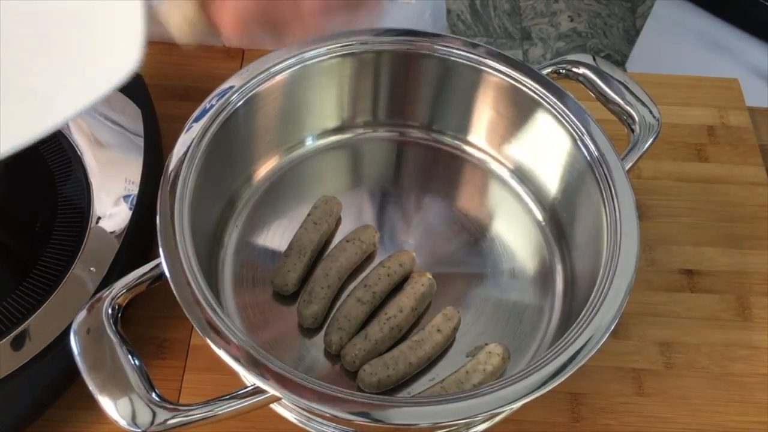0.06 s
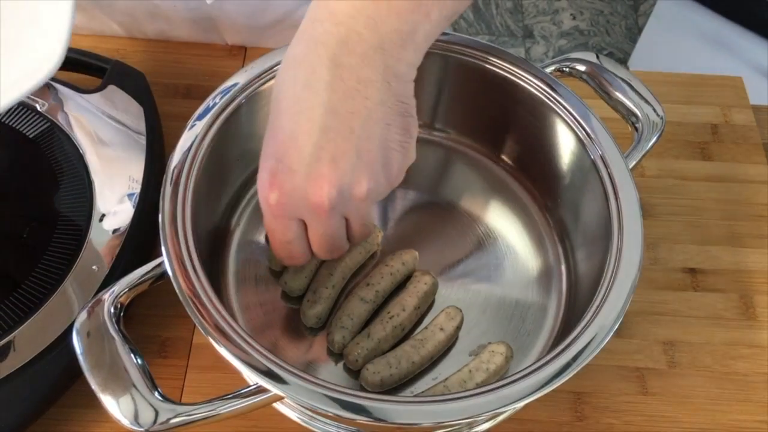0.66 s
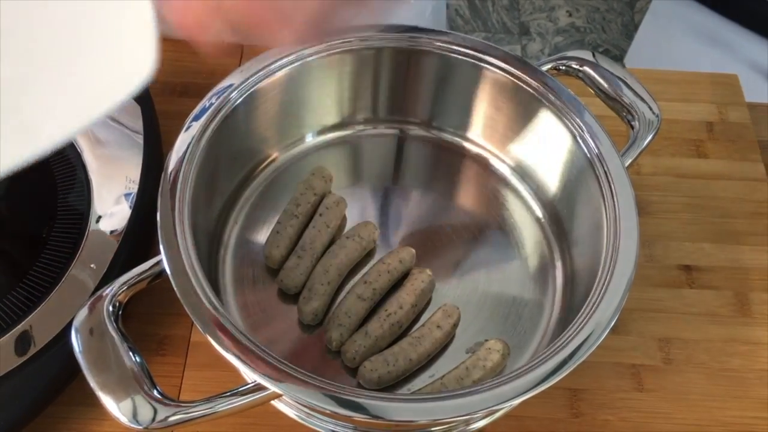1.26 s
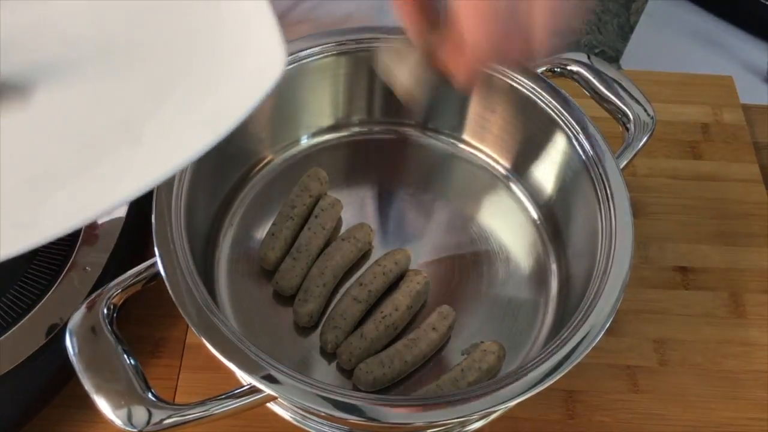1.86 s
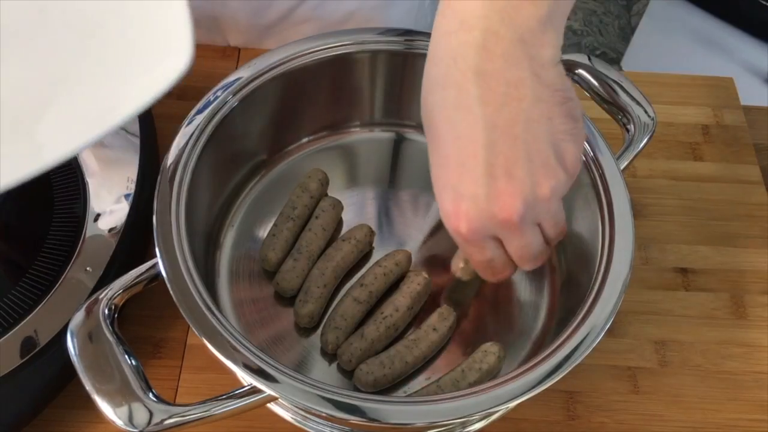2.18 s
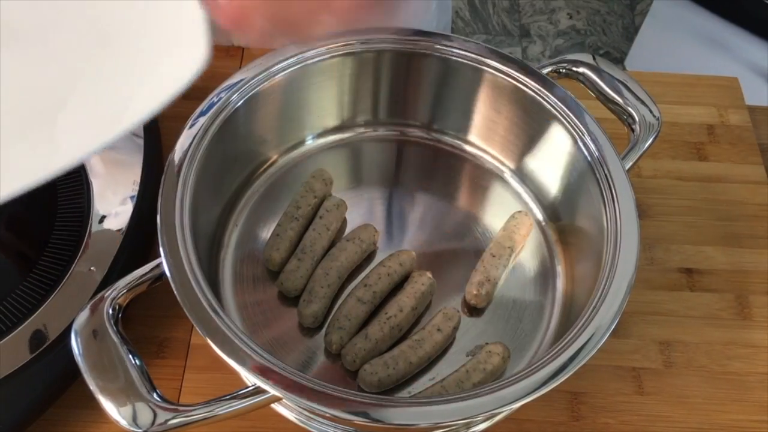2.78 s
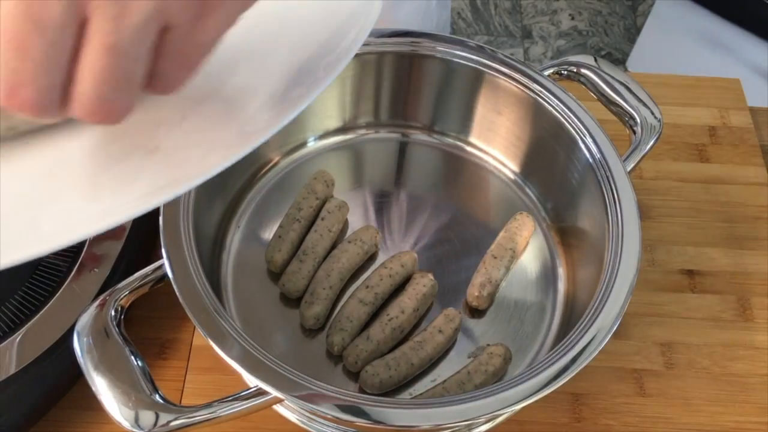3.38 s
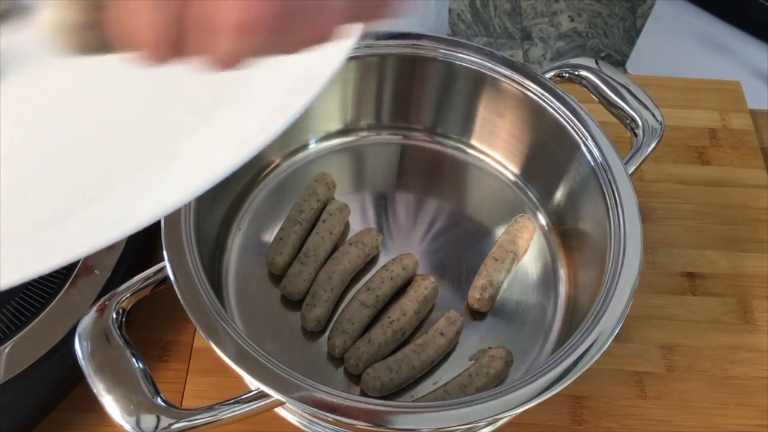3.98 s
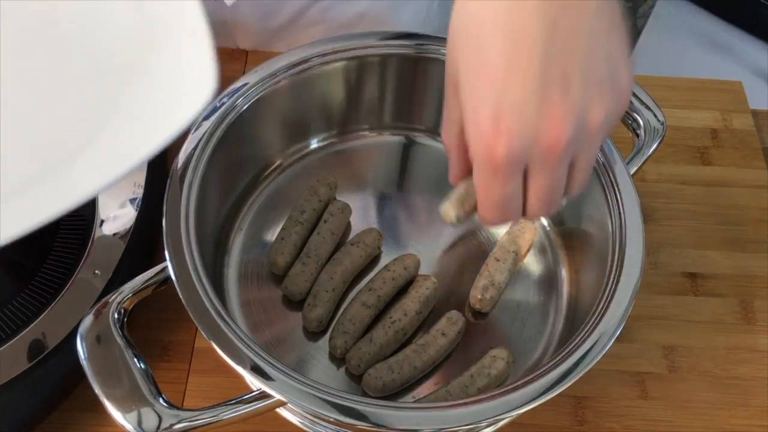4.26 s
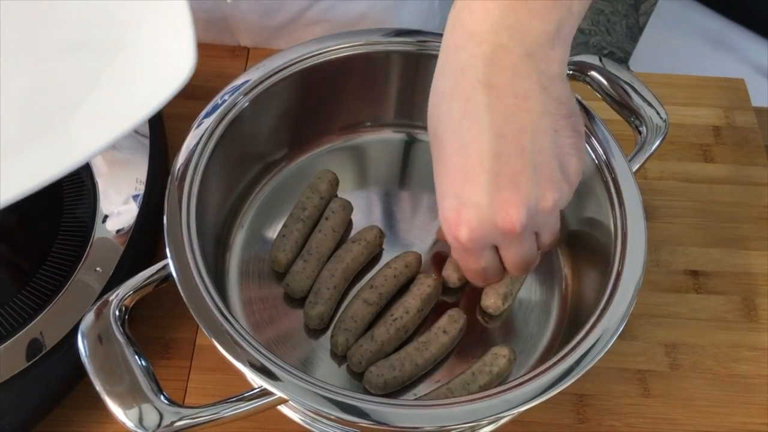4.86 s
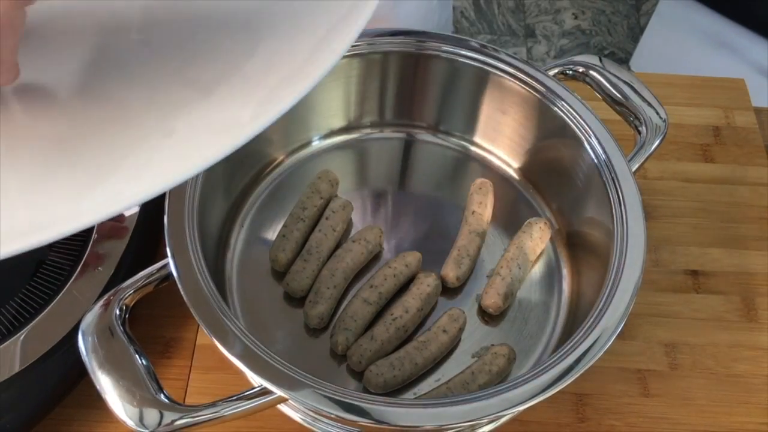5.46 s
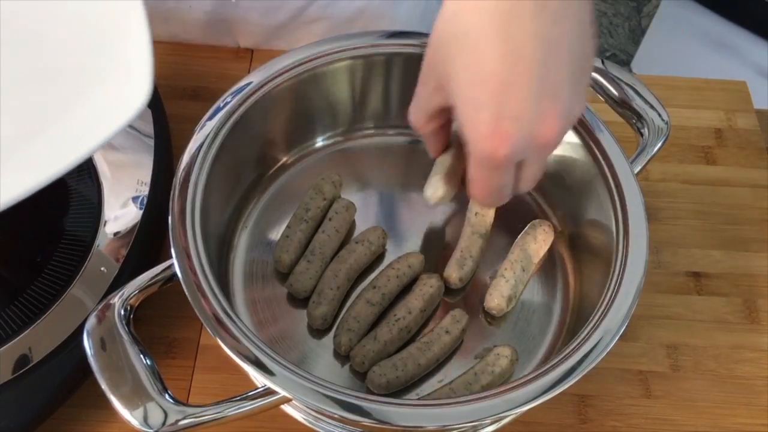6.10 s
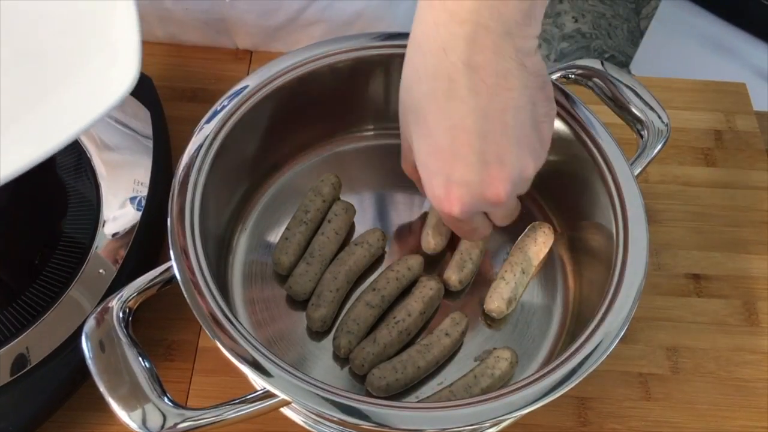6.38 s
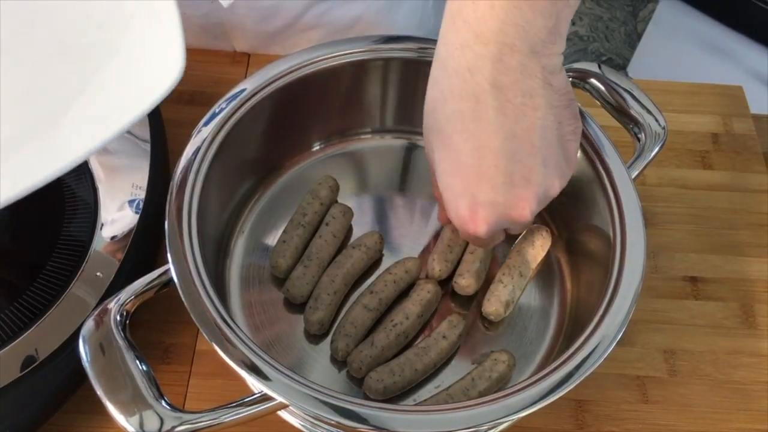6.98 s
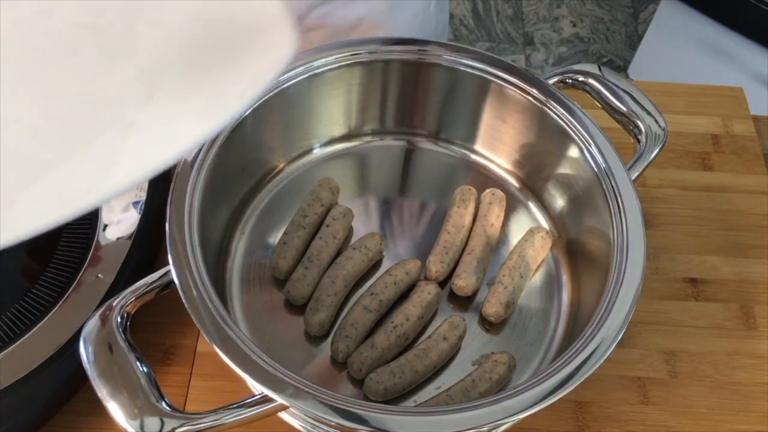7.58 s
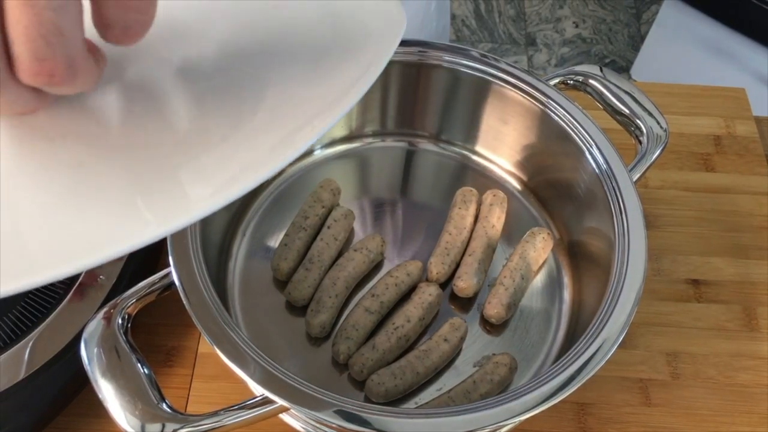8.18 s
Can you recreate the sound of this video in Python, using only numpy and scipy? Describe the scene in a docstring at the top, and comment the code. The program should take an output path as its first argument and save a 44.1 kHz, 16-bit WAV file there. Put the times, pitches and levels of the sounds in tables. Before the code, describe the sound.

Hard sausages are laid one at a time in a dry steel pot. Each lands with a sharp tap or a quick little clatter that makes the metal ring briefly, sometimes with a tiny squeak or a low thump of the pot. Soft knocks on a china plate fall between the four landings and after the last. The sounds are close, with a light kitchen echo over a faint rumble, hum and hiss.

```python
"""In a small kitchen, hard, cold sausages are taken from a plate and laid one by one in a dry steel pot.
Each lands in a quick clatter of touches that sets the pot ringing; some skid with a tiny squeak,
and now and then the pot thumps on its board. Between landings the plate is knocked softly.
Landings and knocks echo off the walls, over a low rumble, a hum and a faint hiss."""
import sys
import numpy as np
from scipy import signal
from scipy.fft import rfft, irfft
from scipy.io import wavfile
from scipy.ndimage import uniform_filter1d

SR = 44100
rng = np.random.default_rng(int(sys.argv[2]) if len(sys.argv) > 2 else 0)


def wav_record(signal):
    """Record a signal, one row per channel, as 16-bit PCM in the file named by sys.argv[1]."""
    frames = np.transpose(np.atleast_2d(signal))
    bounded = np.clip(frames, -1, 1)
    # unit amplitude maps onto the largest positive 16-bit level
    quanta = np.round(bounded * 32767).astype(np.int16)
    wavfile.write(sys.argv[1], SR, quanta)


N = 363384
TIME = np.arange(N) / SR
MIC_TOP_HZ, FINAL_TOP_HZ = 9900, 15800


def undb(db):
    """Turn decibels into a factor to multiply by."""
    return 10 ** (np.asarray(db) / 20)

def unit_rms(x):
    """Scale to an average power of 1."""
    return x / np.sqrt(np.mean(x ** 2))

def unit_energy(x):
    """Scale to a total energy of 1."""
    return x / np.sqrt(np.sum(x ** 2))

def fade(t60, size):
    """A smooth decay that loses 60 dB in t60 seconds, the fade time."""
    return np.exp(-np.log(1000) * TIME[:size] / t60)

def add(out, start_s, x):
    """Mix x into out from start_s on."""
    i = int(start_s * SR)
    out[i:i + len(x)] += x[:N - i]

def noise(colour):
    """Noise shaped by (frequency [Hz], level [dB]) points."""
    hz, db = np.transpose(colour)
    f = np.fft.rfftfreq(N, 1 / SR) + 1
    gain = undb(np.interp(np.log(f), np.log(hz), db))
    return unit_rms(irfft(rfft(rng.standard_normal(N)) * gain, N))

def wander(rate_hz):
    """A slow random drift, about 1 in size."""
    k = int(SR / rate_hz)
    steps = np.repeat(rng.standard_normal(N // k + 1), k)
    return unit_rms(uniform_filter1d(uniform_filter1d(steps, k), k)[:N])

def ring(tones):
    """Fading tones from (pitch [Hz], level [dB], fade time [s]) rows."""
    return sum(undb(db) * fade(t60, SR) * np.sin(2 * np.pi * hz * TIME[:SR]) for hz, db, t60 in tones)

def hump(hz, width_hz, order=2):
    """A resonance: a hill of power around one pitch, steeper at a higher order."""
    f = np.fft.rfftfreq(1024, 1 / SR) + 1
    power = 1 / (1 + ((f ** 2 - hz ** 2) / (f * width_hz)) ** 2) ** order
    return power / power.mean()

def click(power):
    """The sharpest click that has this power at each frequency."""
    cepstrum = irfft(np.log(power + 1e-18) / 2)
    half = len(cepstrum) // 2
    cepstrum[1:half] *= 2
    cepstrum[half + 1:] = 0
    return irfft(np.exp(rfft(cepstrum)))

def shimmer(x, db, t60, size=8192):
    """Follow x with a dense, short ringing, different every time."""
    tail = unit_energy(rng.standard_normal(size) * fade(t60, size))
    return signal.fftconvolve(x, signal.unit_impulse(size) + undb(db) * tail)

# the colour of the room's rumble: (frequency [Hz], relative level [dB])
RUMBLE_COLOUR = [(12, -28), (20, 1), (43, -1.5), (97, -5), (165, -9.5), (259, -11.5), (355, -17),
                 (501, -17), (542, -16.5), (587, -15.5), (1370, -20), (1730, -22), (3440, -24.5),
                 (9390, -29.5), (11000, -49), (14300, -70), (22000, -120)]
def rumble_and_hum():
    """The room rumbles softly under a low, wavering hum."""
    rumble = noise(RUMBLE_COLOUR) * undb(-57.69 + wander(7.4))
    hum_hz = 95 + 3 * wander(23)
    hum = np.sin(2 * np.pi * np.cumsum(hum_hz) / SR) * undb(-67 + 1.5 * wander(4))
    return rumble + hum

# the colour of the hiss: (frequency [Hz], relative level [dB])
HISS_COLOUR = [(300, -6), (650, -2.5), (1100, -10), (2200, -4), (2700, -1), (3600, 2.5), (4300, -0.5),
               (6500, -5), (9300, -4), (10500, -4)]
# how loud the hiss is: (time [s], level [dB])
HISS_SWELL = [(0, -71), (1.15, -64), (2.2, -64), (3, -59.5), (3.6, -63.5), (4.9, -60), (5.3, -57),
              (6.1, -54.5), (7.6, -55), (8.24, -60.5)]
def hiss():
    """A faint hiss slowly swells and sinks."""
    swell_db = np.interp(TIME, *np.transpose(HISS_SWELL))
    return noise(HISS_COLOUR) * undb(swell_db + 0.54 * wander(12))

def through_steel(x, lag_s=0.001492, at_hz=1000):
    """High notes travel faster in sheet steel, so a click arrives as a brief falling chirp."""
    f = np.fft.rfftfreq(len(x), 1 / SR)
    late_cycles = lag_s * (2 * np.sqrt(at_hz * f) - f * np.sqrt(at_hz / MIC_TOP_HZ))
    return irfft(rfft(x) * np.exp(-2j * np.pi * late_cycles))

def touch(db, clack_hz, thud_db, snap_db, tick_db, base_hz, weight_db):
    """One touch shakes the pot's base (thud), its wall (clack) and the hard skin (snap, tick)."""
    thud = hump(base_hz, 440) + 0.4049 * hump(652.24, 160) + undb(weight_db) ** 2 * hump(424, 370)
    clack = (0.52 * hump(clack_hz, 780) + 0.095 * hump(2044, 690)
             + 0.16 * hump(2520, 800) + 0.11 * hump(3790, 1000))
    snap = hump(4926.9, 650) + 1.13 * hump(5900, 2360)
    tick = hump(8069.6, 1700) + 0.4 * hump(9650, 1500)
    body = click(clack + 0.32 * undb(thud_db) ** 2 * thud)
    body = shimmer(through_steel(body), db=-3, t60=0.038)
    # the rough skin meets the steel at many points, which smears the high notes
    skin = click(0.5 * undb(snap_db) ** 2 * snap + 0.47 * undb(tick_db) ** 2 * tick)
    skin = shimmer(through_steel(skin), db=0.1, t60=0.034)
    return undb(db + 16.5) * (body + undb(-1) * skin)

def chatter(lead_s, settle_s, chatter_db, gap_s=0.003, build_db_per_s=595, settle_db_per_s=401):
    """A sausage lands bit by bit, touching before and after the main blow: (delay [s], level [dB])."""
    touches = [(0, 0)]
    for side, length_s, db_per_s in ((-1, lead_s, build_db_per_s), (0.98, settle_s, settle_db_per_s)):
        count = round(length_s / gap_s)
        for k in range(count):
            jitter, scatter_db = rng.standard_normal(2)
            away_s = length_s * (k + 1) / count + 0.18 * gap_s * jitter
            touches.append((side * away_s, chatter_db - db_per_s * k * gap_s + scatter_db))
    return touches

# a sausage taps the steel; thud, snap, tick and chatter are relative to the tap's level:
# (time [s], level [dB], clack pitch [Hz], thud [dB], snap [dB], tick [dB],
#  lead-in [s], settling [s], chatter [dB])
SAUSAGE_TAPS = [(0.5713, -16, 3080, -11, -8, -16.5, 0.0085, 0.0091, 0.5),
                (0.6288, -15.5, 3200, -6, -13, -21, 0.00022, 0.00077, 0),
                (2.5106, -14.5, 3050, -12.5, -9.5, -12, 0.0019, 0.0074, -8),
                (4.6291, -24.5, 3291, 1.5, -6.5, -1.5, 0, 0.017, -18),
                (4.665, -38.5, 2870, -8, -7, -8, 0.0024, 0.0031, 0),
                (4.696, -33.5, 3300, -20, -12, -14, 0.013, 0.0049, -9),
                (4.8263, -26, 3050, -1.5, -12.5, -5.5, 0.0012, .009, -4.5),
                (4.9325, -34, 3145, -15, -9, -9, 0, 0, 0),
                (4.9636, -46.5, 3200, -22, -5.5, -3.5, 0.0026, 0.0045, 0),
                (6.5001, -25, 3055, -0.5, -8, -9, 0.002, 0.017, -3.5),
                (6.5353, -17, 3257, -6, -12.5, -15, 0.014, .008, -4.5),
                (6.5534, -12.5, 3190, -11.5, -18, -15, .0044, 0.0042, -1),
                (6.7836, -18.5, 2940, -16, -5.5, -13, 0, 0.0046, -2.5),
                (6.9352, -22, 3280, -10.5, -6.5, -12.5, 0.0077, 0, -1.5),
                (7.2263, -12, 2660, -2.5, -10, -15.5, 0.008, 0, -13.5)]
def taps(start, end, base_hz, weight_db, spread_octaves=0.14):
    """The taps from start to end: each a quick run of touches at slightly different pitches."""
    out = np.zeros(N)
    for s, db, hz, thud_db, snap_db, tick_db, lead_s, settle_s, chatter_db in SAUSAGE_TAPS:
        if start <= s < end:
            for delay_s, touch_db in chatter(lead_s, settle_s, chatter_db):
                skin_db = -0.28 * touch_db  # lighter touches are more skin, so brighter
                clack_hz = hz * 2 ** (spread_octaves * rng.standard_normal()) if delay_s else hz
                sound = touch(db + touch_db, clack_hz, thud_db, snap_db + skin_db, tick_db + skin_db,
                              base_hz, weight_db)
                add(out, s - start + delay_s, sound)
    return out[:SR]

# the pot's own notes: (pitch [Hz], relative level [dB], fade time [s])
POT_TONES = [(627, 6.5, 0.31), (748, 7, 0.075), (1067.5, 4, 0.3), (1120, -6, 0.32), (1640, 7, 0.19),
             (2064, 13, 0.13), (2270, -21, 0.23), (2500, -6, 0.31), (2670, -3, 0.57), (2730, -16.5, 0.29),
             (3045, -22, 0.24), (3327, -3, 0.52), (3200, 7.5, 0.12), (3700, -7, 0.15), (3840, -0.5, 0.2),
             (4620, -12.5, .35), (4800, -1, 0.6), (5640, 5, .3), (6060, -4.5, .35), (6500, 1.5, 0.56),
             (7870, 8, .3)]
def pot_ring(strikes, ring_db, favoured_hz, boost_db, fade_scale):
    """Each note of the pot stores the energy that reaches its pitch and gives it off as a fading tone."""
    f, colour = signal.welch(strikes, SR, nperseg=128)
    out = np.zeros(len(strikes))
    for hz, db, t60 in POT_TONES:
        closeness = np.exp(-(np.log2(hz / favoured_hz) / 0.091) ** 2)
        gain = undb(db + ring_db + boost_db * closeness - 49.5)
        kept_per_sample = np.exp(-2 * np.log(1000) / (t60 * fade_scale * SR))
        stored = signal.lfilter([1], [1, -kept_per_sample], strikes ** 2 + 1e-18)
        share = np.interp(hz, f, colour) / colour.mean()
        tone = np.sin(2 * np.pi * (hz * TIME[:len(strikes)] + rng.random()))
        out += gain * np.sqrt(stored * share) * tone
    return out

# where each sausage lies, which decides how the pot answers from then on:
# (time [s], ring level [dB], favoured pitch [Hz], its boost [dB], pitch of the base [Hz],
#  weight of the thud [dB], fade time scale [times], echo [dB])
LANDING_SPOTS = [(.5, -8.5, 3390, 11.5, 954.3, -9, 0.51, -6), (2.4, -9, 2075, 6.5, 1120, -16, 1.2, -5.5),
                 (4.5, -10, 1651, 5.5, 1160, -17, .85, -11), (4.75, -9, 1170, -2, 1080, -17, 0.65, -6.5),
                 (6.4, -12.5, 3410, 8.5, 990, -9.5, 0.8576, -10.5),
                 (6.7, -5.5, 3390, 14.5, 664, -8, 0.7, -7.5), (6.9, -8.5, 616, 7, 704, -29, 0.6, -7.5),
                 (7.099, -11, 3280, 8, 850, -6.5, 1.15, -8.5)]
def landings():
    """At each spot, taps and skids set the pot ringing, and the kitchen echoes it all."""
    out = np.zeros(N)
    ends = [spot[0] for spot in LANDING_SPOTS[1:]] + [N / SR]
    for spot, end in zip(LANDING_SPOTS, ends):
        start, ring_db, favoured_hz, boost_db, base_hz, weight_db, fade_scale, echo_db = spot
        strikes = taps(start, end, base_hz, weight_db) + squeaks(start, end)
        ringing = pot_ring(strikes, ring_db, favoured_hz, boost_db, fade_scale)
        add(out, start, kitchen_echo(strikes + ringing, echo_db))
    return out

# the echo off the walls: (frequency [Hz], fade time [s], relative level [dB])
WALL_ECHO = [(150, 0.73, 8.5), (350, 0.58, 0.5), (716, 0.7, -1), (1400, 0.7, 4), (2880, 0.59, -4),
             (5400, 0.656, 0.5), (9020, 0.5, 0.5)]
def kitchen_echo(x, echo_db, gap_s=0.0027, build_s=0.016):
    """Add a wash of echoes that builds after a short gap; each frequency fades at its own pace."""
    hz, t60, db = np.transpose(WALL_ECHO)
    f, t, cells = signal.stft(rng.standard_normal(SR), SR, nperseg=256)
    t60, db = (np.interp(np.log(f + 1), np.log(hz), column)[:, None] for column in (t60, db))
    tail = signal.istft(cells * undb(db) * np.exp(-np.log(1000) * t / t60))[1]
    build = np.clip((TIME[:len(tail)] - gap_s) / build_s, 0, 1)
    early = 1 + undb(6.5) * fade(0.11, len(tail))  # extra echo off the worktop and the cook
    echo = signal.fftconvolve(x, unit_energy(tail * build * early))[:len(x)]
    return x + undb(echo_db) * echo

# skids on the steel: (time [s], pitch [Hz], relative level [dB], length [s])
SKIDS = [(0.698, 8160, -19.5, 0.0028), (2.5, 6900, -29, 0.0053), (2.505, 3107, -31, 0.0064),
         (4.6241, 7900, -28, 0.0025), (4.78, 6230, -25, 0.0025), (4.798, 6700, -50, 0.06),
         (6.7485, 7460, -33.5, 0.002)]
def squeaks(start, end, size=4096):
    """The skids from start to end: a sausage sticks and slips, making a tiny, raspy squeak."""
    out = np.zeros(N)
    for s, hz, db, length_s in SKIDS:
        if start <= s < end:
            squeal, rasp = hump(hz, 1200, order=1), 0.076 * hump(2800, 4600)
            slip = signal.fftconvolve(rng.standard_normal(size), click(squeal + rasp))[:size]
            age = TIME[:size] / length_s
            swell = 2 * age * np.exp(1 - 2 * age)
            add(out, s - start, undb(db - 4.5) * swell * unit_rms(slip))
    return out[:SR]

# the pot's low thumps: (time [s], pitch [Hz], level [dB], fade time [s])
POT_THUMPS = [(0.705, 91.91, -42, 0.2216), (0.744, 62, -47, .25), (6.79, 92.3, -47.5, 0.5),
              (7.225, 137.9, -39.5, 0.039)]
def pot_thumps():
    """The whole pot rocks on its board, each time with one low, fading tone."""
    out = np.zeros(N)
    for s, hz, db, t60 in POT_THUMPS:
        add(out, s, ring([(hz, db, t60)]))
    return out

# the plate's own notes: (pitch [Hz], relative level [dB], fade time [s])
PLATE_TONES = [(899, -1.5, 0.1), (1660, 0, 0.046), (2550, -5.5, 0.03417), (3601.6, -4.5, 0.054)]
# knocks on the plate: (time [s], ring level [dB], relative thump level [dB], brightness [dB per octave])
PLATE_KNOCKS = [(1.5261, -58.5, -56, 5), (3.259, -55, -49, 5.5), (5.4444, -54.5, -52.5, 4),
                (7.7935, -43, -53, -2.5), (7.916, -49.5, -61, -2), (8.173, -47.5, -52, -2.5)]
def plate_knocks():
    """Soft knocks on a china plate muffled by a hand: a dull thump and a brief ring."""
    out = np.zeros(N)
    thump = shimmer(click(hump(180, 447.8) + 0.084 * hump(2400, 3500)), db=3.5, t60=0.016)
    lowest_hz = PLATE_TONES[0][0]
    for s, ring_db, thump_db, tilt in PLATE_KNOCKS:
        tones = [(hz, db + ring_db + tilt * np.log2(hz / lowest_hz), t60) for hz, db, t60 in PLATE_TONES]
        add(out, s, ring(tones))
        add(out, s, undb(thump_db + 24.5) * thump)
    return kitchen_echo(out, echo_db=-11)

def scene():
    """Pot, plate and room together in one channel."""
    return (landings() + pot_thumps() + plate_knocks() + rumble_and_hum() + hiss())[None]

def record(dry):
    """The microphone misses the highest notes; a trace of amplifier noise joins, then the top is cut."""
    heard = signal.sosfilt(signal.ellip(10, .3, 70, MIC_TOP_HZ, fs=SR, output="sos"), dry)
    heard = heard + undb(-71.5) * rng.standard_normal(dry.shape)
    return signal.sosfilt(signal.ellip(10, .2, 70, FINAL_TOP_HZ, fs=SR, output="sos"), heard)


dry = scene()
out = record(dry)
wav_record(out)
```